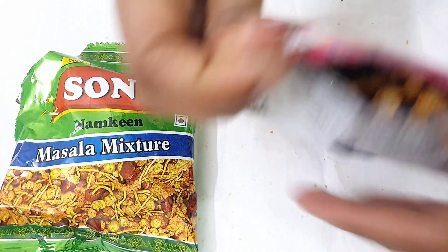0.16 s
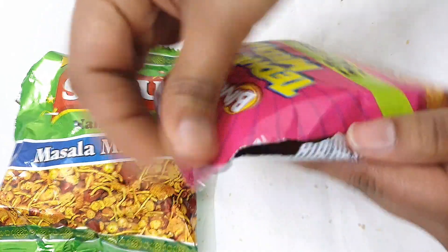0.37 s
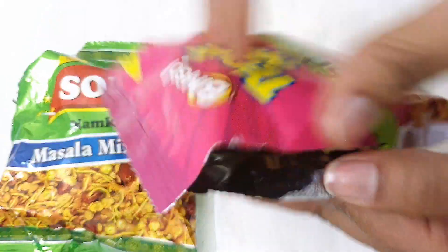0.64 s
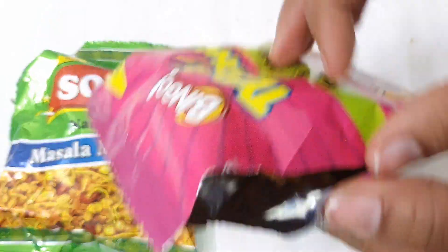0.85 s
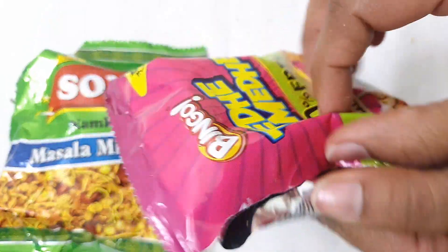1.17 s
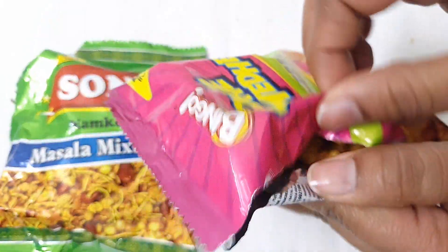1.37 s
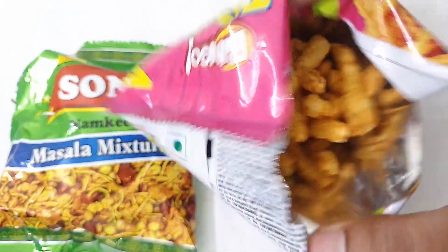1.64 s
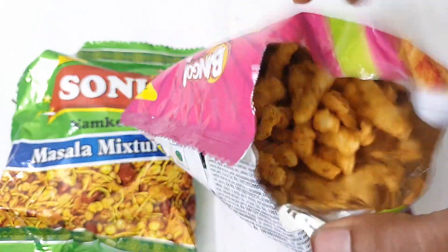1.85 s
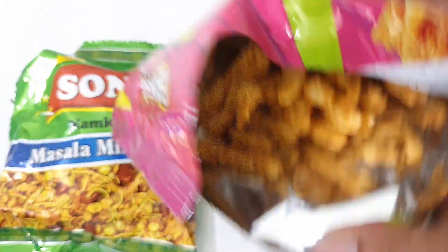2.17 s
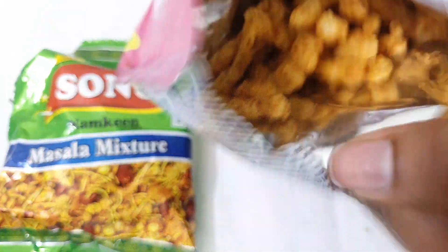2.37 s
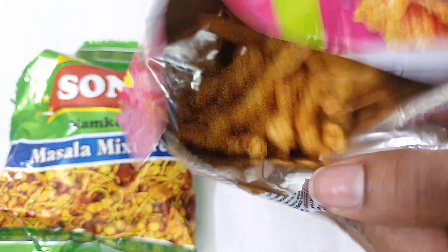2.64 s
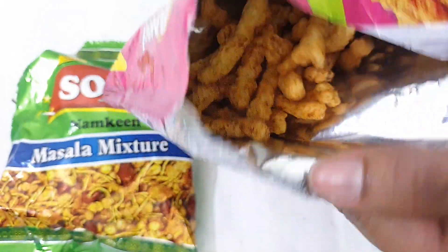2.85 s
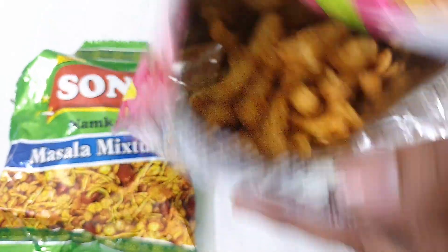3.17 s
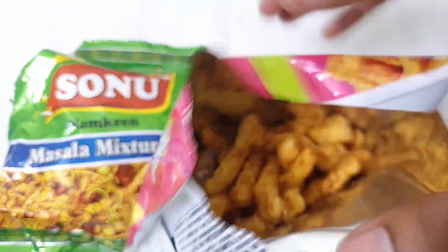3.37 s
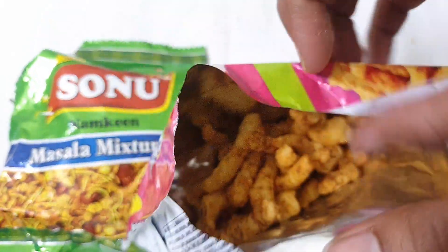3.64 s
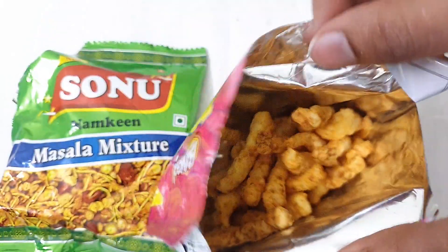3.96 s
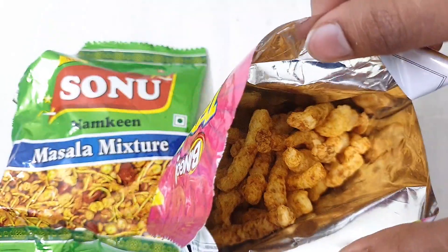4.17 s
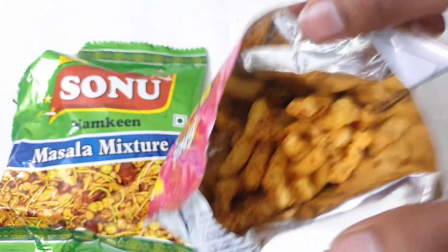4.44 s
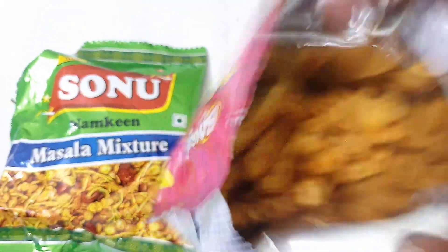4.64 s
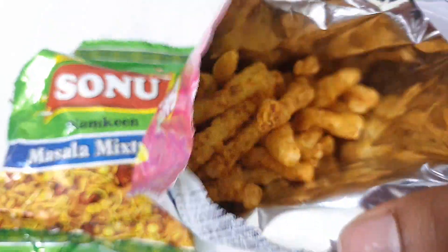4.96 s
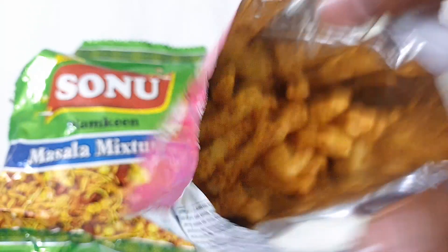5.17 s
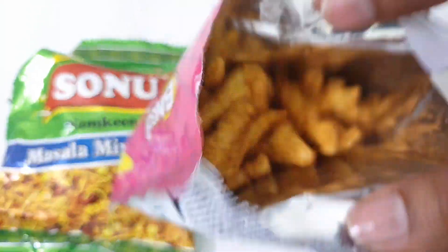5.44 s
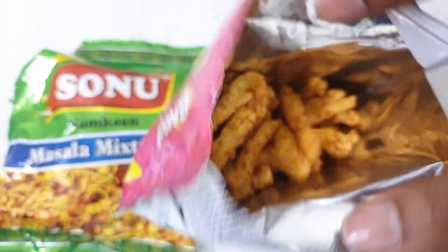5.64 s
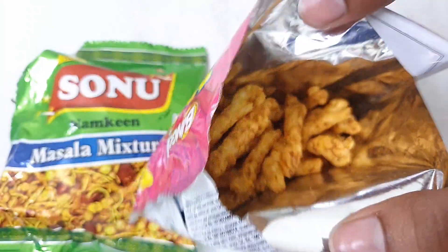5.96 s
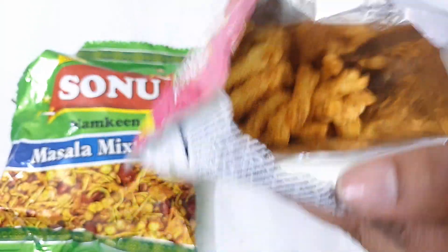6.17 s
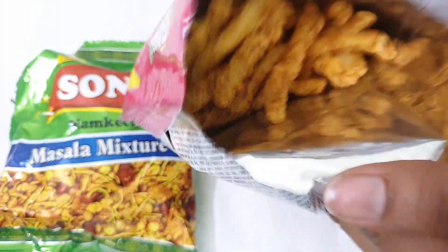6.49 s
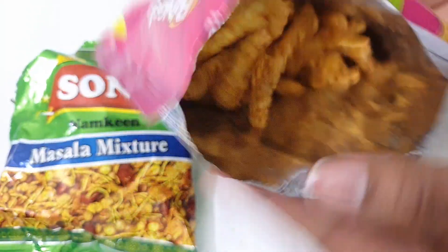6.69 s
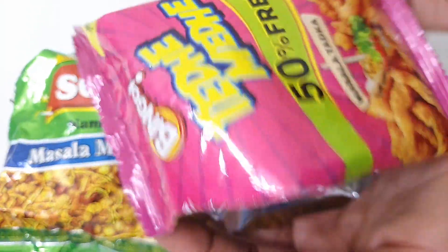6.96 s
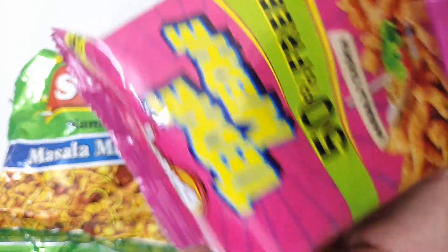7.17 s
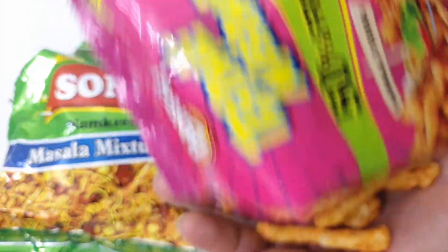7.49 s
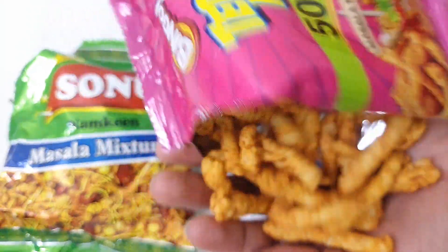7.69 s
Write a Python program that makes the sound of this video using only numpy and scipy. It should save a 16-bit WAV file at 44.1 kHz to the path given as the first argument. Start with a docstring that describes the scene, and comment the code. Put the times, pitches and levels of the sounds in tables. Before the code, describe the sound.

A stiff crinkly packet starts quietly with a soft finger rustle, then bursts into crisp snaps and crackling as it is opened. Repeated shakes bring dense clusters of bright crackles, short ragged rips and muffled low bumps, with calmer gaps between. Finally light, dry pieces clatter in short woody ticks into a hand. Close microphone, short lively room reflection, quiet hiss and slightly wavering mains hum.

```python
"""In a small hard room, a foil-lined snack packet is pulled open, shaken and tipped by hand, close up.
Creases snap as coloured noise bursts, alone or in ragged runs, over a fine crackle of random ticks.
Walls and bumps thump as low noise; at the end dry snacks knock as short pitched rings and pour out.
A decaying noise tail answers for the room, and a wavering mains hum lies under quiet coloured hiss."""
import sys
import numpy as np
from scipy import signal
from scipy.fft import rfft, irfft
from scipy.io import wavfile
from scipy.ndimage import uniform_filter1d

SR = 44100
rng = np.random.default_rng(int(sys.argv[2]) if len(sys.argv) > 2 else 0)


def inscribe(sig):
    """Save sig as 16-bit PCM at rate SR to the path in sys.argv[1].

    A 1-D sig is mono; a 2-D sig holds one channel per row.
    Samples are clipped to [-1, 1] before scaling.
    """
    pcm = np.round(np.clip(np.atleast_2d(sig).T, -1, 1) * 32767)
    wavfile.write(sys.argv[1], SR, pcm.astype(np.int16))


N = 344862

# background hiss spectrum, relative: [f/Hz, level/dB]
HISS_SPECTRUM = [(30, 25), (150, 33.5), (400, 25.5), (2000, 14.5), (9000, 9.5), (16000, 6)]
# film as the microphone colours it, relative: [f/Hz, level/dB]
FILM_SPECTRUM = [(180, -66), (300, -10), (597, -16.5), (923, -8), (1450, -10), (2480, -7), (2790, -6),
                 (3300, -9.5), (6140, 1.5), (9980, -18), (15200, -25.5), (16500, -40)]
# air pushed by the swinging bag walls, relative: [f/Hz, level/dB]
WALL_SPECTRUM = [(25, -18), (70, -12), (250, -4.5), (3000, -48)]
# hands grip, pull or shake the bag: [start t/s, hold t/s, crackle gain level/dB]
GRIPS = [(0, 0.17, -68), (0.324, 0.19, -42.5), (0.698, 0.25, -52.5), (1.074, 0.25, -48.5),
         (1.42, 0.056, -45.5), (1.537, 0.17, -38.5), (1.745, 0.2, -48.5), (2.327, 0.38, -48.5),
         (2.528, 0.2, -41.5), (2.772, 0.065, -45.5), (2.907, 0.2, -57.5), (3.17, 0.3, -48.5),
         (3.741, 0.25, -47.5), (4.564, 0.09, -58), (4.7, 0.27, -40), (5.361, 0.18, -40.5),
         (5.709, 0.039, -49.5), (5.99, 0.12, -54.5), (6.243, 0.02, -47), (6.461, 0.057, -43),
         (6.655, 0.13, -44.5), (6.91, 0.91, -51)]
# smooth rustle of fingers on film, most at the first touch: [t/s, gain level/dB inside the grip gain]
FINGER_RUB = [(.2, 1), (.3, -15)]
# single creases buckling: [t/s, drive level/dB, low part against middle level/dB]
CREASE_SNAPS = [(0.041, -36.5, 1.5), (0.1134, -46, 8.5), (0.226, -43, 8), (.3542, -26, -18),
                (0.396, -30, -14), (0.4246, -16, -6), (.4469, -34, -14), (.4834, -23, -19),
                (0.4995, -19, -21), (.6714, -45, 8), (.6863, -47, 7), (.724, -29, 1.5), (.766, -36, 1),
                (.818, -25, -17), (.851, -29.5, 3), (0.8814, -23, -2), (0.9468, -33.5, -7),
                (1.136, -31, 1.5), (1.1746, -33, -5), (1.2024, -17.5, -7.5), (1.2596, -26, -4),
                (1.402, -30, -10), (1.4696, -28.5, -2), (1.518, -25.5, -8), (1.6166, -14, -15),
                (1.64, -12.5, -15), (1.663, -17.5, -4), (1.7832, -23, -44.5), (1.826, -18, -45),
                (2.1029, -29.5, -10), (2.2297, -33.5, -2), (2.283, -25.5, -1), (2.3675, -27.5, -5),
                (2.4031, -29.5, -1), (2.446, -27.5, 0), (2.5117, -32.5, 1), (2.542, -32, -18),
                (2.5761, -16, -2), (2.6219, -37, 9), (2.6481, -26, 4), (2.7353, -22, -8),
                (2.7612, -20, 3.5), (2.7872, -24.5, 1), (2.8933, -22, -13), (2.9426, -30, -9),
                (3.062, -32, -5), (3.175, -31, 2), (3.2093, -27, -7), (3.249, -31, -25), (3.343, -27.5, 6),
                (3.3723, -22.5, -3.5), (3.6697, -35.5, 2), (3.706, -32, -6), (3.7582, -33.5, 0),
                (3.7677, -22.5, -3.5), (3.7885, -22, -3.5), (3.846, -21, -12), (3.8846, -27, -16),
                (3.9153, -27, -10), (3.9429, -29.5, -11), (4.0333, -21.5, -5), (4.0518, -30, 0),
                (4.0755, -33.5, -1), (4.104, -29, -3), (4.192, -30.5, -4), (4.251, -41.5, 4.5),
                (4.3416, -29.5, -68), (4.413, -45.5, 3.5), (4.5403, -31, -1), (4.5625, -24.5, -6),
                (4.6412, -26, -4), (4.7094, -23.5, -2), (4.7812, -25.5, -7), (4.801, -28.5, 3),
                (4.8394, -24, -22), (4.981, -30.5, -11), (5.011, -26, -1), (5.039, -37.5, 4),
                (5.1673, -56.5, 18), (5.29, -53, 18), (5.3278, -42, 9), (5.3463, -14.5, -11.5),
                (5.382, -24.5, 2.5), (5.6107, -32, -21), (5.7079, -26, -3), (5.7775, -34, -7),
                (5.793, -33.5, 8), (6.0142, -32, 1), (6.121, -31, 2.5), (6.1781, -36.5, 3), (6.435, -34, 2),
                (6.4588, -27, 1), (6.524, -26, -6), (6.649, -29, -18), (6.7103, -32.5, 1),
                (6.8409, -28, -10), (6.9002, -25, -3), (6.9964, -26, 0.5), (7.447, -31.5, 1),
                (7.5776, -29.5, 4), (7.7536, -26, -6.5), (7.8112, -32, 1)]
# folds giving way in a ragged run of slips:
# [t/s, drive level/dB, low part against middle level/dB, run time constant t/ms]
FOLD_RIPS = [(0.307, -33, -3, 6.1), (0.5652, -27, -3, 20.5), (1.3059, -27, -18, 22),
             (1.5385, -21.5, -1, 11), (1.5613, -14, -13.5, 22), (1.6012, -19.5, -7, 160),
             (1.672, -17, -2.5, 9.6), (1.9367, -35.5, 5.5, 26), (2.029, -36, 8.5, 26), (2.6693, -24, 1, 36),
             (2.7242, -28.5, 1.5, 18), (3.2864, -18.5, -1.5, 13), (3.4203, -27.5, -3, 32),
             (4.579, -28.5, 1.5, 19), (4.724, -18.5, 2, 19), (4.742, -17.5, -6, 15), (4.9204, -21.5, 3, 24),
             (4.937, -17, 1, 11), (5.3962, -19, 1.5, 13), (5.418, -17.5, -2, 8.4), (5.4653, -15, -1, 37),
             (5.81, -26, -6, 16.5), (6.2731, -22, -5, 12.3), (6.7647, -32, .5, 38), (6.917, -25.5, 1.5, 18),
             (7.1679, -32.5, 5, 9.6), (7.261, -30.5, 2, 18), (7.316, -31.5, 4, 20), (7.366, -33, 5, 37)]
# a hand or the bag's weight bumps softly: [t/s, drive level/dB]
SOFT_BUMPS = [(1.633, -43), (1.911, -43), (2.858, -56), (3.02, -59), (3.413, -61), (4.04, -51),
              (4.721, -43), (4.91, -36.5), (5.403, -39.5), (5.74, -52), (6.253, -49.5), (7.155, -44)]
# clearest knocks of snacks landing in the hand: [t/s, starting level/dB, pitch f/Hz]
SNACK_KNOCKS = [(7.072, -44, 2230), (7.107, -27.5, 2180), (7.168, -55, 2150), (7.199, -39, 1990),
                (7.233, -31.5, 2060), (7.279, -32, 1720), (7.473, -41, 1890), (7.557, -36, 1700),
                (7.704, -41, 1160)]

HISS_DB = -69.5
HUM_HZ, HUM_DB = 100, -70
SPLIT_HZ = (2500, 9000)   # low, middle and top of the film
TAKE_UP_DB_PER_S, LET_GO_DB_PER_S = 875, 196
REST_DB = -69   # crackle gain of the film settling by itself
RISE_S = 0.0006   # snap attack
SNAP_RUN_MS = 0.98   # a few slips cling to every single snap
WALL_DB = -21   # against the film's short-term level
ROOM_DB, ROOM_FIRST_S = -15, 0.004
ROOM_LOW_HZ, ROOM_TOP_HZ = 3500, 7400
ROOM_LOW_T60_S, ROOM_MIDDLE_T60_S, ROOM_TOP_T60_S = 0.3, 0.5, 0.2
BUMP_LOW_HZ, BUMP_TOP_HZ, BUMP_S = 45, 237, 0.028
POUR_START_S, POUR_DB = 6.92, -64   # snacks slide out into the hand
KNOCKS_PER_S, KNOCK_CYCLES = 90, 14   # cycles of ring for a 60 dB fall
CUTOFF_HZ = 16800


def from_db(db):
    """Decibels to gain."""
    return 10 ** (np.asarray(db) / 20)


def rms_one(x):
    """Scale to unit rms."""
    return x / np.sqrt(np.mean(x ** 2) + 1e-20)


def colour(x, spectrum, size=8192):
    """Causal (minimum-phase) filter of unit power that follows a spectrum table."""
    hz, level_db = np.transpose(spectrum)
    grid = np.maximum(np.arange(size // 2 + 1), 1) * SR / size
    gain = from_db(np.interp(np.log(grid), np.log(hz), level_db))
    # folding the cepstrum forward in time packs the energy at the start
    cepstrum = irfft(np.log(gain))
    cepstrum[1:size // 2] *= 2
    cepstrum[size // 2 + 1:] = 0
    pulse = irfft(np.exp(rfft(cepstrum)))
    return signal.fftconvolve(x, pulse / np.sqrt(np.sum(pulse ** 2)))[:N]


def drift(rate):
    """Slow random wander of spread 1; rate in Hz."""
    r = np.exp(-2 * np.pi * rate / SR)
    wander = signal.lfilter([1], [1, -2 * r, r * r], rng.standard_normal(N + SR))
    return rms_one(wander[SR:])   # skip the filter's start-up


def hiss():
    """Steady background noise, weighted towards the lows."""
    return from_db(HISS_DB) * colour(rng.standard_normal(N), HISS_SPECTRUM)


def hum():
    """Mains hum: one sine that wavers a little in level."""
    level = from_db(HUM_DB + 1.5 * drift(4))
    return level * np.sqrt(2) * np.sin(2 * np.pi * HUM_HZ * np.arange(N) / SR)


def film_band(x, part):
    """The low (0), middle (1) or top (2) part of the film's range."""
    edges = [(SPLIT_HZ[0], "low"), (SPLIT_HZ, "band"), (SPLIT_HZ[1], "high")][part]
    return signal.sosfilt(signal.butter(3, *edges, fs=SR, output="sos"), x)


def handling():
    """Crackle gain: each grip is taken up fast, held and let go; powers add."""
    t, power = np.arange(N) / SR, from_db(REST_DB) ** 2
    for start_s, hold_s, level_db in GRIPS:
        take_up_db = TAKE_UP_DB_PER_S * np.maximum(start_s - t, 0)
        let_go_db = LET_GO_DB_PER_S * np.maximum(t - start_s - hold_s, 0)
        power = power + from_db(level_db - take_up_db - let_go_db) ** 2
    return np.sqrt(power)


def crackle(part_levels_db=(3.0, 0, -3.0), per_s=350, t60=0.009):
    """Small random ticks in clumps, mostly faint, each with a brightness of its own."""
    born = rng.random(N) < per_s * from_db(4.0 * drift(25)) / SR
    sizes = born * from_db(5.5 * np.minimum(rng.exponential(1, N), 3))
    decay = from_db(-60 / (t60 * SR))   # per sample
    out = 0
    for part, part_db in enumerate(part_levels_db):
        ticks = sizes * from_db(rng.normal(0, 5.0, N))   # brightness varies tick by tick
        envelope = signal.lfilter([1], [1, -decay], ticks + 1e-18)
        noise = rms_one(envelope) * rng.standard_normal(N)
        out = out + from_db(part_db) * film_band(noise, part)
    return out


def finger_rub():
    """Fingers sliding on film give smooth noise with extra lows."""
    rub_db = np.interp(np.arange(N) / SR, *np.transpose(FINGER_RUB))
    return from_db(rub_db) * (rng.standard_normal(N) + film_band(rng.standard_normal(N), 0))


def snaps(t60s=(0.016, 0.012, 0.008), runs_db=(-10.0, -12.0, -17.0), size=4096):
    """A crease buckles in milliseconds amid a gritty run of smaller, duller slips, most of them after it."""
    rows = [(*row, SNAP_RUN_MS) for row in CREASE_SNAPS] + list(FOLD_RIPS)
    s, level_db, low_db, run_ms = np.transpose(rows)
    lead = size // 4   # room for slips ahead of the snap
    t = (np.arange(size) - lead) / SR
    after, run_s = np.maximum(t, 0), run_ms[:, None] / 1000
    # grit steps to a new random level every 32 samples
    grit_db = 5.2 * np.repeat(rng.standard_normal((len(s), size // 32)), 32, axis=1)
    run = from_db(grit_db) * np.exp(np.where(t < 0, 4 * t, -t) / run_s)
    top_db = rng.normal(4.56, 1.68, len(s))   # some creases are brighter
    noise = rng.standard_normal((len(s), 3, size))
    bursts = 0
    for part, (part_db, t60, run_db) in enumerate(zip((low_db, 0, top_db), t60s, runs_db)):
        buckle = (1 - np.exp(-after / RISE_S)) * from_db(-60 * after / t60)
        envelope = buckle + from_db(run_db) * run
        burst = film_band(envelope * noise[:, part], part)
        # even out the chance energy of each noise burst
        share = np.sum(burst ** 2, axis=1) / np.sum(envelope ** 2, axis=1)
        gain = from_db(level_db + part_db) / np.sqrt(share / share.mean())
        bursts = bursts + burst * gain[:, None]
    out = np.zeros(N + size)
    for i, burst in zip(np.round(s * SR).astype(int), bursts):
        out[i:i + size] += burst
    return out[lead:][:N]


def wall_thumps(film):
    """Whenever the film crackles, whole walls of the bag swing and push air as low noise."""
    # short-term film level over 800 samples, mostly just past
    swing = np.sqrt(np.abs(uniform_filter1d(film ** 2, size=800, origin=300)))
    return from_db(WALL_DB) * colour(swing * rng.standard_normal(N), WALL_SPECTRUM)


def room(x):
    """A dense dying tail after the first reflection; the treble and the lower range die sooner."""
    t = np.arange(SR) / SR
    noise = rng.standard_normal(SR) * (t > ROOM_FIRST_S)
    body = signal.sosfilt(signal.butter(2, ROOM_TOP_HZ, fs=SR, output="sos"), noise)
    low = signal.sosfilt(signal.butter(2, ROOM_LOW_HZ, fs=SR, output="sos"), body)
    tail = low * from_db(-60 * t / ROOM_LOW_T60_S)
    tail = tail + (body - low) * from_db(-60 * t / ROOM_MIDDLE_T60_S)
    tail = tail + (noise - body) * from_db(-60 * t / ROOM_TOP_T60_S)
    return from_db(ROOM_DB) * signal.fftconvolve(x, tail / np.sqrt(np.sum(tail ** 2)))[:N]


def bumps():
    """Each bump is a soft puff of low noise that swells and dies away."""
    t, envelope = np.arange(N) / SR, 0
    for s, level_db in SOFT_BUMPS:
        age = np.maximum(t - s, 0) / BUMP_S
        envelope = envelope + from_db(level_db) * age * np.exp(-age)
    low_band = signal.butter(2, [BUMP_LOW_HZ, BUMP_TOP_HZ], "band", fs=SR, output="sos")
    return envelope * rms_one(signal.sosfilt(low_band, rng.standard_normal(N)))


def snacks():
    """Dry hollow pieces knock together, each a short pitched ring; the faint ones come at random."""
    t = np.arange(N) / SR
    sizes = from_db(4.5 * np.minimum(rng.exponential(1, N), 3))
    knocks = (rng.random(N) < KNOCKS_PER_S / SR) * sizes
    dealt, pour = rng.integers(0, 12, size=N), 0   # each knock gets one of 12 pitches
    for k, hz in enumerate(np.geomspace(800, 2400, num=12)):
        # two-pole resonator: decay per sample r, angle per sample w
        r, w = from_db(-60 * hz / (KNOCK_CYCLES * SR)), 2 * np.pi * hz / SR
        struck = knocks * (dealt == k) + 1e-18
        pour = pour + signal.lfilter([0, np.sin(w)], [1, -2 * r * np.cos(w), r * r], struck)
    out = from_db(POUR_DB) * (t > POUR_START_S) * rms_one(pour)
    for s, level_db, hz in SNACK_KNOCKS:
        cycles = hz * np.maximum(t - s, 0)
        out = out + from_db(level_db - 60 * cycles / KNOCK_CYCLES) * np.sin(2 * np.pi * cycles)
    return out


def scene():
    """Packet, its room and the background."""
    film = colour(snaps() + handling() * (crackle() + finger_rub()), FILM_SPECTRUM)
    packet = film + wall_thumps(film) + bumps() + snacks()
    return (packet + room(packet) + hiss() + hum())[None]


def record(dry):
    """The top is cut steeply."""
    return signal.sosfilt(signal.cheby2(14, 70, CUTOFF_HZ, fs=SR, output="sos"), dry)


dry = scene()
out = record(dry)
inscribe(out)
```